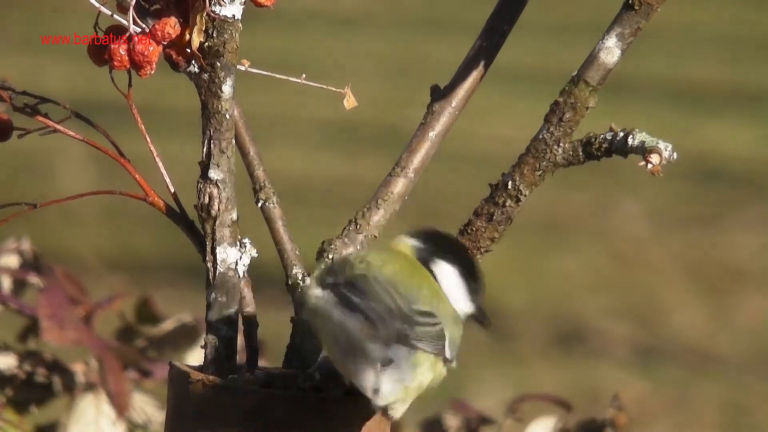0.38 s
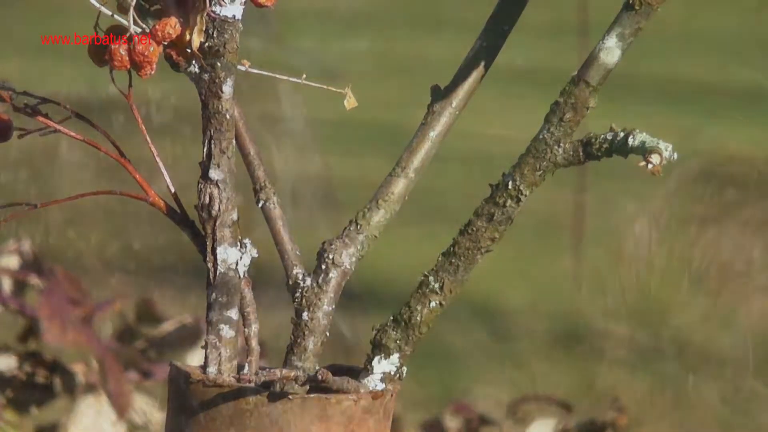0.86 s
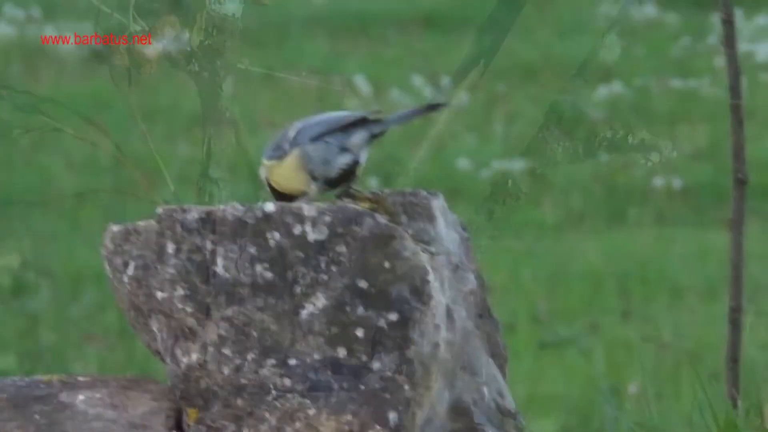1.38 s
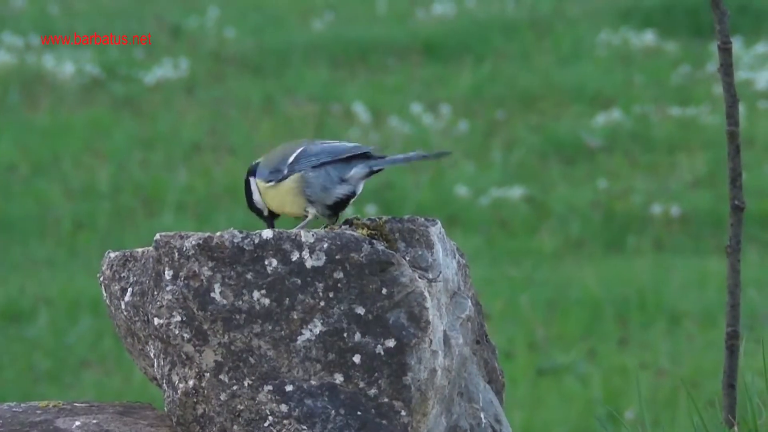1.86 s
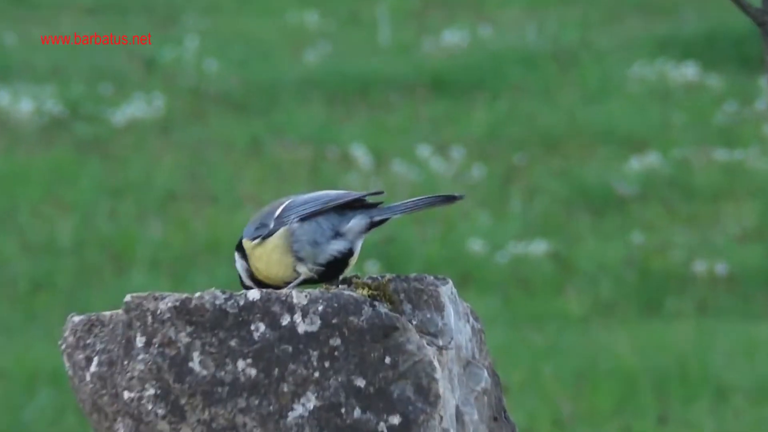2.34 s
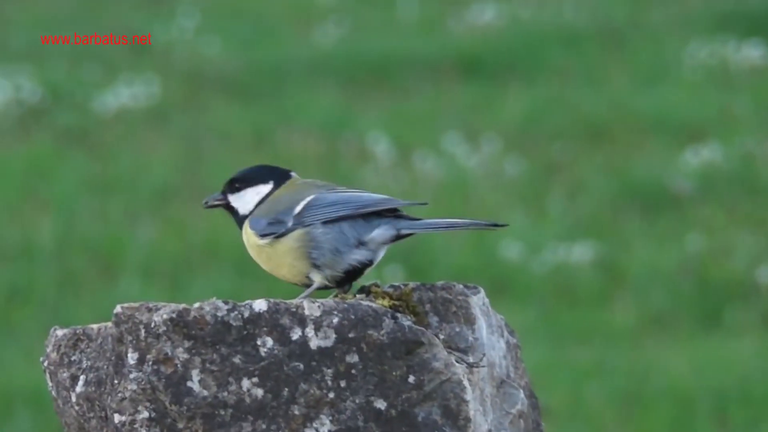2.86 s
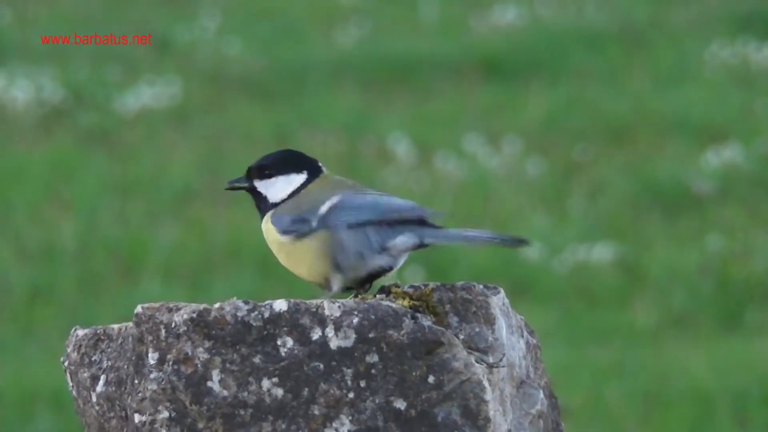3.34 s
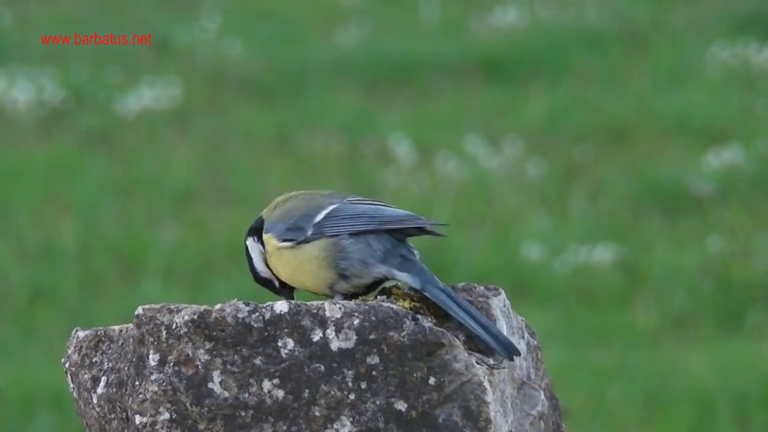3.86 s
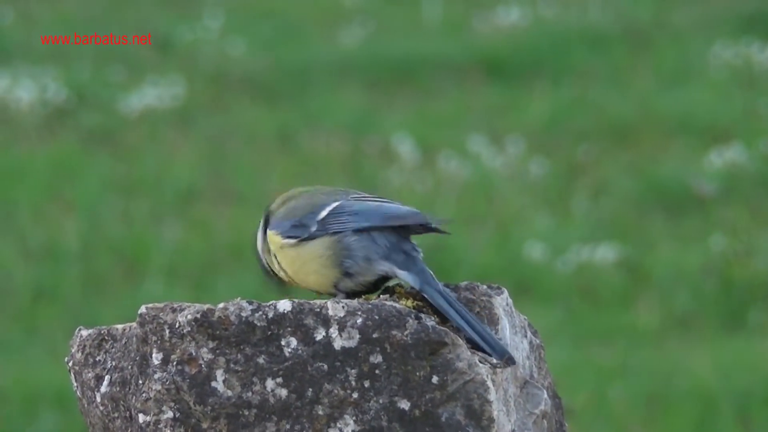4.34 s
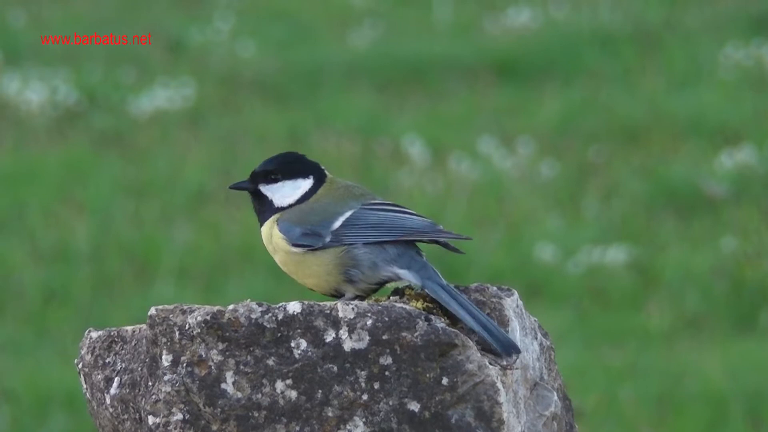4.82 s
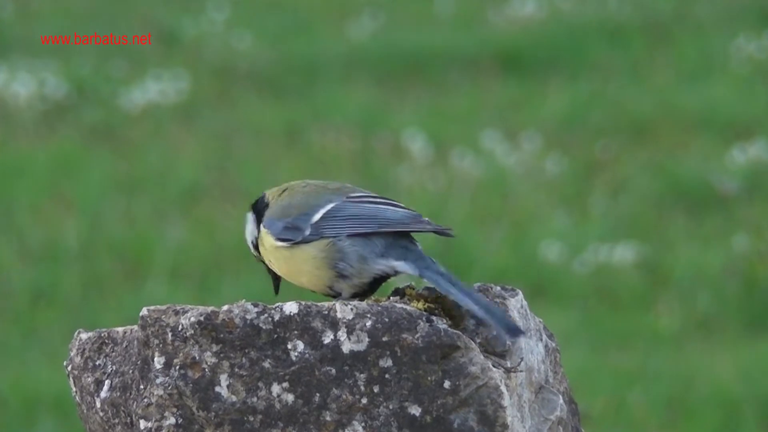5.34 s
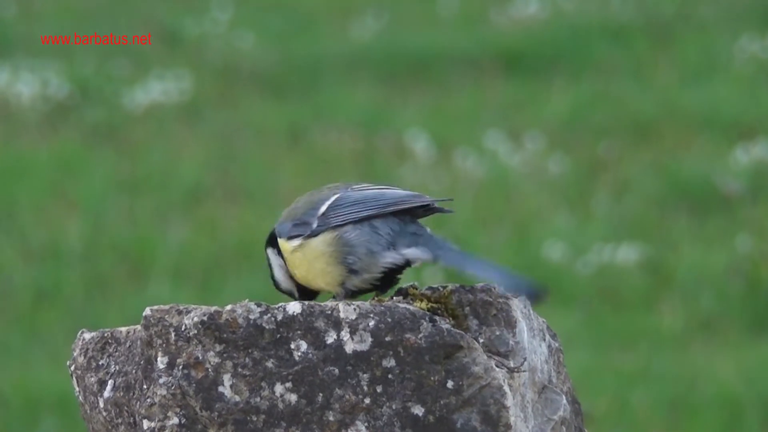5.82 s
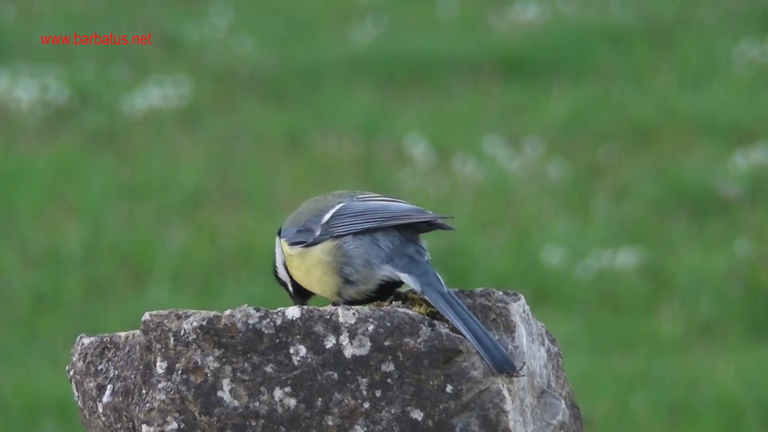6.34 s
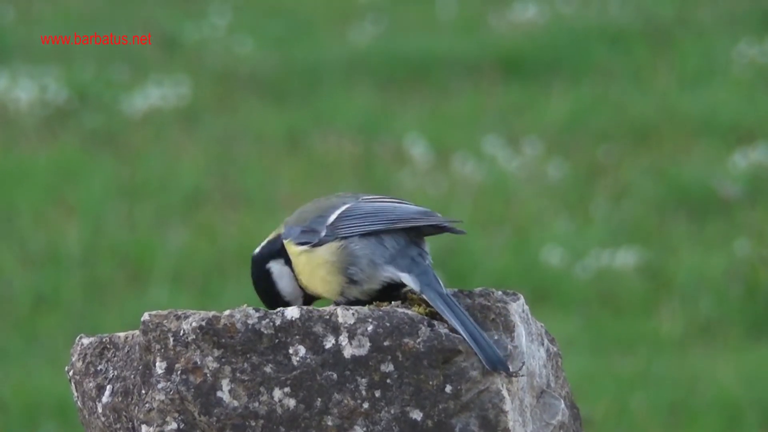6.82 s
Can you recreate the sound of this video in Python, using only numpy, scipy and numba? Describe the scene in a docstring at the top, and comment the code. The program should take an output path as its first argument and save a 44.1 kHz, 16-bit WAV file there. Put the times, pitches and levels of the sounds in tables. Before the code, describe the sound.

Quiet outdoor air with soft wide hiss, faint hum and small irregular low wind pops; another bird chatters weakly far off until 0.6 s. The air drops out for an instant at 0.7 s and fades back. From 1.1 to 2.25 s a close, central great tit alternates very high whistles, each flicked up from below, with short buzzy two-toned notes, every tenth of a second; a four-pulse dry churr cuts in at 1.5 s. A pause follows. At 3.2 s come a tiny peep and thin seep, then buzzes, a whistle and soft scrapes with a tick, a fading six-pulse churr at 3.6 s, and more whistle-buzz pairs from 3.9 to 4.5 s. Faint descending seeps sound at 4.9 and 5.1 s, small ticks at 5.1 and 5.9 s. From 6.0 s harsh scolding rasps, about fifteen a second, swell from faint to loud, with a brief gap at 6.65 s, until 6.93 s.

```python
"""A great tit calls close by: rising whistles alternate with buzzy notes, with thin seeps and short churrs.
Later a run of scolding rasps swells up; far chatter, ticks, soft scrapes, hum and wind pops lie underneath.
Whistles are swept tones with overtones, and buzzes are two tones that mix into sums and differences.
Churrs, rasps and chatter are noise through moving resonances, chopped by flaps. The rest is shaped noise,
apart from a few short pure peeps. The bird is nearly central, with a faint short echo."""
import sys
import numpy as np
from scipy import signal
from scipy.fft import rfft, irfft
from scipy.io import wavfile
from scipy.ndimage import uniform_filter1d
from numba import njit

SR = 44100
rng = np.random.default_rng(int(sys.argv[2]) if len(sys.argv) > 2 else 0)


def gain_from_db(level_db):
    """Convert decibel levels to linear amplitude factors (20 dB per decade)."""
    decades = np.asarray(level_db, float) / 20
    return 10 ** decades


def waveform_to_disk(signal):
    """Save audio, clipped to [-1, 1], as 16-bit WAV at the path in sys.argv[1]."""
    frames = np.transpose(np.atleast_2d(signal))
    scaled = np.clip(frames, -1, 1) * 32767
    samples = np.round(scaled).astype(np.int16)
    wavfile.write(sys.argv[1], SR, samples)


N = 306495
T = np.arange(N) / SR  # time of every sample in seconds

# how windpipe and beak pass each pitch: f/Hz, level/dB
THROAT = [(1500, -26), (2000, -25), (2700, -11), (3500, -5.5), (4700, 3.5), (5900, -4), (7000, -13.5),
          (8000, -20.5), (9500, -45), (16000, -57)]
# lower and upper limit of the bird's rough voices: f/Hz
VOICE_BAND = [1685, 6080]
# breath over a rasp: share of its length, level/dB
RASP_BREATH = [(0, -13), (.12, -7), (.45, -1.5), (.75, 1), (.9, -3), (1, -20)]
# resonances of a rasp beside the main one: f/Hz, width/Hz, level/dB, growth/dB per dB of effort
RASP_MODES = [(2504, 480, -5.5, -0.45), (4200, 800, -2, -0.031), (5920, 1540, -4, 0.19),
              (6860, 2800, 0.5, 0.6)]


def track(s, values):
    """A control curve at every sample."""
    return np.interp(T, s, values)


def unit(x):
    """Scale to rms 1."""
    return x / np.sqrt(np.mean(x ** 2))


def on_log(hz, table):
    """Read a table of f/Hz and level/dB as a gain, with pitch on a log scale."""
    f, db = np.transpose(table)
    return gain_from_db(np.interp(np.log(np.maximum(hz, 1)), np.log(f), db))


def drift(hz):
    """Smooth chance of rms 1 that changes about hz times a second."""
    k = int(SR / hz)
    return unit(uniform_filter1d(uniform_filter1d(rng.standard_normal(N), k), k))


def edged(s, db, edge_s):
    """Gain along a note that opens and shuts within edge_s."""
    gate = track([s[0] - edge_s, s[0], s[-1], s[-1] + edge_s], [0, 1, 1, 0])
    return gain_from_db(track(s, db)) * gate


@njit
def svf(x, hz, width):
    """State-variable band-pass: a resonance with a moving centre."""
    y, b, l = np.empty(len(x)), 0., 0.
    for i in range(len(x)):
        g, k = np.tan(np.pi * hz[i] / SR), width / hz[i]
        v = (b + g * (x[i] - l)) / (1 + g * (g + k))
        b, l, y[i] = 2 * v - b, l + 2 * g * v, k * v
    return y


def steep(x, hz, width):
    """A resonance applied twice, so that its sides fall more steeply."""
    hz = hz + np.zeros(N)
    return svf(svf(x, hz, 1. * width), hz, 1. * width)


def air():
    """Distant hum and hiss, unlike left and right, with one-sided low pops of wind on the microphone."""
    # colour of the sound common to both sides: f/Hz, level/dB per Hz
    mid_colour = [(15, -43), (25, -21), (130, -1.5), (170, -7), (405, -6), (439, -2), (476, -4.5),
                  (988, -7.5), (1610, -9), (3920, -10.5), (7920, -21), (9070, -22), (16000, -27)]
    # colour of the difference between the sides: f/Hz, level/dB per Hz
    side_colour = [(15, -44), (25, -4), (92, -4.5), (326, -2.5), (476, 0), (531, -1.5), (840, -3.5),
                   (1400, -5), (3820, -7), (4740, -15), (7710, -18.5), (9070, -18.5), (16000, -20.5)]
    # the air drops out for an instant and fades back: t/s, level/dB
    air_course = [(0, 0.2), (0.7158, 1), (.7165, -42), (.731, -77), (.745, -14), (.76, -3.5), (1.0, -2),
                  (1.3, 0.7), (6.95, 0.74)]
    mid_db, side_db = -53, -54
    dip_hz, dip_width_hz, dip_depth = 7780, 210, 0.59  # a narrow band where the hiss is weaker
    pops_per_s, pop_db, pop_s = 45, -46, .0007

    hz = np.arange(N // 2 + 1) * SR / N
    dip = 1 - dip_depth * np.exp(-((hz - dip_hz) / dip_width_hz) ** 2)
    mid, side = (unit(irfft(rfft(rng.standard_normal(N)) * on_log(hz, colour) * dip, N))
                 for colour in (mid_colour, side_colour))
    hiss = gain_from_db(mid_db) * mid + gain_from_db(side_db) * side * np.array([[1], [-1]])
    hiss = hiss * gain_from_db(.5 * drift(14.5))

    # pops come at random, in looser and denser groups, and differ in strength
    chance = pops_per_s / SR * gain_from_db(3.5 * drift(18))
    hits = (rng.random(N) < chance) * gain_from_db(2.5 * rng.standard_normal(N))
    bump = np.exp(-.5 * (np.arange(-200, 200) / SR / pop_s) ** 2)
    low_cut = signal.butter(1, 90, "high", fs=SR, output="sos")
    pops = signal.sosfilt(low_cut, np.convolve(hits, bump, "same"))
    lean = np.array([[.85], [1.15]])  # pops are stronger on the right
    return (hiss + gain_from_db(pop_db) * pops * lean) * gain_from_db(track(*np.transpose(air_course)))


def harsh(notes, breath, modes, rise_hz, rate_hz, wobble, depth, width, steady, rise, follow, late, ready):
    """Chaotic membranes drive a rising throat resonance; unsteady flaps chop the airflow."""
    share, shape = np.transpose(breath)
    hz, gain, bright, swell = np.full(N, 3000.), np.zeros(N), np.zeros(N), np.zeros(N)
    for start, end, db, open_hz, bright_db in notes:
        length = end - start
        g = edged(start + share * length, db + shape, 0.00049)
        on = g > 0
        gain += g
        # with ready > 0, a bright note starts with its throat further open
        first_hz = open_hz - rise_hz / (1 + gain_from_db(bright_db)) ** ready
        hz[on] = track([start, start + rise * length], [first_hz, open_hz])[on]
        bright[on] = gain_from_db(bright_db)
        # the side resonances swell (late > 0) or fade (late < 0) over the note
        swell[on] = track([start, end], [1 - late, 1])[on]
    opening = (hz / 3500) ** follow  # the opening beak lifts the higher resonances along
    effort = np.clip(gain / gain_from_db(-28), .03, 3)

    chaos = rng.standard_normal(N)
    voice = unit(steep(chaos, hz, width))
    for f, mode_width, db, grow in modes:
        above = f > hz  # only resonances above the main one brighten and follow the beak
        ringing = unit(steep(chaos, f * opening ** above, mode_width))
        voice = voice + swell * gain_from_db(db) * bright ** above * effort ** grow * ringing

    # the swing of the membranes saturates, which evens the loudness out
    voice /= (uniform_filter1d(voice ** 2, size=50) + 0.17) ** (steady / 2)
    voice /= np.sqrt(uniform_filter1d(voice ** 2, size=900))
    flap = 2 * np.pi * np.cumsum(rate_hz * (1 + wobble * drift(rate_hz / 2))) / SR
    chop = unit(1 + depth / (1 + bright) * np.cos(flap))  # bright notes are chopped less
    band = signal.butter(N=6, Wn=VOICE_BAND, btype="band", fs=SR, output="sos")
    return signal.sosfilt(band, gain * voice * chop)


def far_chatter():
    """Faint chatter of another bird further off: rasps with a narrower throat resonance."""
    # start t/s, end t/s, level/dB, open throat f/Hz, brightness/dB
    far_notes = [(.015, .05, -51, 3500, -3), (.08, .12, -53.5, 3450, -12), (.16, .195, -53.5, 3640, -10),
                 (.25, .29, -55, 3970, -10), (.44, .49, -54, 4140, -4), (.59, .63, -57, 4400, -8)]
    return harsh(far_notes, RASP_BREATH, RASP_MODES[1:], rise_hz=300, rate_hz=560, wobble=.2, depth=.45,
                 width=600, steady=.85, rise=.7, follow=.1, late=.3, ready=0)


def scrapes():
    """Soft friction: fluttering noise in a low band that moves."""
    # start t/s, end t/s, level/dB, start f/Hz, end f/Hz
    rubs = [(3.268, 3.325, -49.5, 1250, 1700), (3.4, 3.416, -47.5, 860, 800), (3.555, 3.6, -59, 1950, 2000)]
    out, noise = 0, rng.standard_normal(N) * gain_from_db(2.5 * drift(249))
    for start, end, db, hz0, hz1 in rubs:
        band = unit(steep(noise, track([start, end], [hz0, hz1]), 850))
        out = out + edged([start, end], [db, db - 5], .004) * band
    return out


def ticks():
    """Small hard contacts: a dying crack of noise through a few broad modes."""
    # t/s, relative level/dB, ring t/s
    contacts = [(3.399, -28.5, 0.0044), (5.128, -36.5, 0.0033), (5.936, -30.5, 0.0058)]
    # what rings in a tick: f/Hz, width/Hz, relative level/dB
    contact_modes = [(440, 140, -2), (830, 1050, -3), (1900, 300, 1), (3600, 1300, 2), (5490, 2400, 1),
                     (8980, 1200, -8.5), (13230, 12300, -11.5)]
    crack = sum(gain_from_db(db) * (T >= s) * np.exp(-np.maximum(T - s, 0) / ring) for s, db, ring in contacts)
    noise = rng.standard_normal(N)
    ringing = unit(sum(gain_from_db(db) * unit(steep(noise, f, w)) for f, w, db in contact_modes))
    return crack * ringing / 2


def peeps():
    """Brief or faint pure sine notes that glide and swell like a bell curve."""
    # start t/s, end t/s, start f/Hz, end f/Hz, level/dB at the middle
    pure_notes = [(0.742, 0.758, 4000, 3940, -56), (3.06, 3.135, 6640, 6850, -62),
                  (3.2167, 3.2208, 3050, 4100, -31)]
    out = np.zeros(N)
    for start, end, hz0, hz1, db in pure_notes:
        bell = np.sin(np.pi * track([start, end], [0, 1]))
        phase = 2 * np.pi * np.cumsum(track([start, end], [hz0, hz1])) / SR
        out += np.sqrt(2) * gain_from_db(db) * bell * np.sin(phase)
    return out


def rasps():
    """Scolding rasps: a wide throat resonance that climbs as the beak opens, chopped by fast flaps."""
    # start t/s, end t/s, level/dB, open throat f/Hz, brightness/dB
    rasp_notes = [(6.035, 6.075, -48.5, 3940, -10), (6.1, 6.139, -45.5, 4260, -6),
                  (6.165, 6.205, -42.5, 4100, 0), (6.23, 6.275, -37.5, 4000, -3),
                  (6.297, 6.343, -33.5, 3800, -3), (6.367, 6.414, -30, 3920, -4),
                  (6.434, 6.487, -27, 3900, -2.5), (6.506, 6.56, -25.5, 3920, -3),
                  (6.581, 6.636, -25, 3880, -3), (6.74, 6.791, -26, 4140, -8.5),
                  (6.821, 6.871, -24.5, 4000, -9.5), (6.888, 6.932, -24, 3900, -9)]
    return harsh(rasp_notes, RASP_BREATH, RASP_MODES, rise_hz=970, rate_hz=560, wobble=.2, depth=.45,
                 width=1100, steady=.85, rise=.7, follow=.3, late=.7, ready=0)


def churrs():
    """Short churrs: a narrower throat resonance with slower, deeper flaps and early side resonances."""
    # start t/s, end t/s, level/dB, open throat f/Hz, brightness/dB
    churr_notes = [(1.479, 1.509, -19.5, 3580, -7.5), (1.519, 1.546, -23.5, 3325, -50),
                   (1.5605, 1.586, -25, 3300, -49), (1.602, 1.628, -26, 3320, -51),
                   (3.607, 3.635, -25.5, 3600, -9.5), (3.647, 3.671, -32.5, 3310, -25),
                   (3.689, 3.709, -34, 3170, -20), (3.731, 3.752, -33, 3160, -50),
                   (3.776, 3.792, -38, 3150, -26.5), (3.824, 3.844, -38.5, 3050, -30)]
    # breath over a churr: share of its length, level/dB
    churr_breath = [(0, -16), (.12, -8), (.35, 0), (.6, -1.5), (.85, -8), (1, -18)]
    # resonances beside the main one: f/Hz, width/Hz, level/dB, growth/dB per dB of effort
    churr_modes = [(2200, 450, -27, -.3), (4500, 1200, 5, -.35), (5400, 1000, -3, -.1),
                   (6800, 1000, -16, .5)]
    return harsh(churr_notes, churr_breath, churr_modes, rise_hz=790, rate_hz=260, wobble=.15, depth=.62,
                 width=550, steady=.9, rise=.25, follow=.1, late=-1.5, ready=3)


def buzzes():
    """Both sides of the voice box sound at once; their coupling makes sum and difference tones."""
    # start t/s, length t/s, first voice alone t/s, first voice's starting f/Hz, second voice f/Hz, level/dB
    buzz_notes = [(1.208, 0.056, 0.0075, 2687, 1901, -18), (1.393, 0.056, 0.006, 2654, 1863, -18.5),
                  (1.814, 0.06, 0.0088, 2800, 1877, -20), (2.003, .057, 0.01, 2760, 1864, -21),
                  (2.2, .054, 0.0058, 2695, 1846, -23), (3.323, 0.052, 0.0072, 2775, 1868, -22),
                  (3.515, 0.051, 0.0072, 2696, 1895, -25), (4.009, 0.063, .012, 2854, 1894, -22.5),
                  (4.203, .058, 0.0111, 2747, 1844, -23.5), (4.417, .046, 0.0062, 2600, 1806, -25.5)]
    # tones of the pair: multiple of first, multiple of second, relative level/dB, change over the note/dB
    coupling = [(1, 0, -11, -5.5), (2, 0, -3.5, -3.5), (3, 0, -22, -11.5), (0, 1, -27.5, 10),
                (0, 2, -7, -8), (0, 3, -10.5, -5), (1, 1, -5, 0.5), (1, 2, -11.5, 2), (2, -1, -14.5, -46),
                (2, 1, -21.5, -3), (1, 3, -30.5, -2), (2, 2, -30.5, -13.5)]
    attack_db, attack_s, hold_s = -5, 0.0083, 0.01
    fade_db, close_s, close_db = -9, 0.0052, -7.5
    breath_db, pop_db = -15, -5
    slide_hz_per_s, rest_hz = 11500, 2518  # the first voice slides down to its resting pitch
    # the second voice joins sharp, sags with the first, then creeps up
    sharp_hz, sag_s, creep_hz = 40, 0.011, 45
    wander, jitter, shimmer_db = .007, .0075, 1.5  # slow and quick pitch unsteadiness (share), level flicker

    gain, second, along, pop, path = 0, 0, 0, 0, []
    for start, length, alone, first_hz, second_hz, db in buzz_notes:
        s = start + np.array([0, attack_s, attack_s + hold_s, length - close_s, length])
        g = edged(s, db + np.array([attack_db, 0, 0, fade_db, fade_db + close_db]), .003)
        gain = gain + g
        # the membranes snap open
        pop = pop + gain_from_db(db + attack_db) * track(start - np.array([.003, .0025, .0005]), [0, 1, 0])
        second = second + (g > 0) * track([start + alone - .001, start + alone + 0.00011], [0, 1])
        along = along + (g > 0) * track([start + alone, start + length], [0, 1])
        t = np.linspace(0, length, num=30)
        sharp = np.exp(-(t / sag_s) ** 2)
        first_path = np.maximum(first_hz - slide_hz_per_s * t, rest_hz)
        second_path = second_hz + sharp_hz * sharp + creep_hz * (t / length) ** 2
        path += zip(start + t, first_path, second_path)
    s, *pitch = np.transpose(path)
    hz = np.array([track(s, f) * (1 + wander * drift(99.8) + jitter * drift(1490)) for f in pitch])
    phase = 2 * np.pi * np.cumsum(hz, axis=1) / SR

    # each voice bends the pitch of the other, so neighbouring tones stand a quarter turn apart
    tones = 0
    for m, n, db, change in coupling:
        size = gain_from_db(db + change * along + shimmer_db * drift(270)) * (second if n else 1)
        tones = tones + size * np.exp(1j * (m * phase[0] + n * phase[1] + n * n * np.pi / 2))
    # the swing of the membranes saturates, flattening the beats between the tones
    tones = (tones / (np.abs(tones) + .3) ** .55).imag
    tones /= np.sqrt(uniform_filter1d(tones ** 2, size=200))

    breath = unit(steep(rng.standard_normal(N), 4500, 1400))
    voice = gain * tones + (gain_from_db(breath_db) * gain * second + gain_from_db(pop_db) * pop) * breath
    low_cut = signal.butter(6, VOICE_BAND[0], "high", fs=SR, output="sos")
    return signal.sosfilt(low_cut, voice)


def held(t, pitch, glide, db):
    """Pitch and effort of a held whistle: a slow glide, a fade and a close, drooping if it glides down."""
    fade_db, fade_db_per_hz = -13.5, -0.0578  # it fades, less so the more it glides down
    close_s, close_hz, close_db = .006, -250, -9
    droop_below_hz = -55  # only notes gliding down further than this droop in pitch
    closing = np.clip(1 - (t[-1] - t) / close_s, 0, 1) ** 2
    f = pitch + glide * t / t[-1]
    level = db + (fade_db + fade_db_per_hz * glide) * t / t[-1] + close_db * closing
    effort = level - 20 * np.log10(on_log(f, THROAT))  # make up for what the throat takes away
    return f + close_hz * closing * (glide < droop_below_hz), effort


def whistles():
    """One membrane sweeps up through the throat resonance, so its overtone flashes first, then holds."""
    # hold starts t/s, length t/s, pitch f/Hz, glide over the hold f/Hz, level/dB, sweep effort/dB, settling t/s
    whistle_notes = [(1.1187, 0.057, 7970, -500, -40.5, -17.5, 0.0023),
                     (1.3094, 0.055, 7340, -78, -25.5, -18.5, .0015),
                     (1.73, 0.058, 7330, -92, -28.5, -20, .002),
                     (1.916, 0.054, 7260, -83, -27, -20, 0.0016),
                     (2.1114, 0.057, 7070, 32.5, -25, -20, 0.0086),
                     (3.427, 0.052, 7290, -31, -38.5, -24, .006),
                     (3.9207, 0.064, 7220, 28, -31, -23, 0.0042),
                     (4.114, 0.057, 7210, -12.5, -30, -23, .003), (4.31, 0.055, 7090, 35, -29, -23, 0.0036)]
    # thin seeps that start near their pitch: start t/s, length t/s, pitch f/Hz, glide f/Hz, level/dB, settling t/s
    seep_notes = [(3.2302, .057, 7540, -170, -37, .002), (4.864, 0.089, 7640, -400, -40.5, 0.0058),
                  (5.103, 0.098, 7540, -400, -44, 0.0087)]
    # the upward sweep: f/Hz, effort/dB
    sweep = [(2000, -20), (2200, 0), (2500, -5), (2950, 0), (3700, 1.5), (4700, -1.5), (5800, 1),
             (6500, 0.5)]
    # how long before the hold each point of the sweep comes: t/s
    sweep_lead = [.0125, .011, .0095, .0078, .006, .0045, .003, 0]
    # second and third harmonic of the whistling membrane: level/dB
    overtones = [-8, -17]
    ease_s = 0.0034  # the effort of the sweep eases into that of the hold
    hiss_db, hiss_hz, hiss_s = -24, 4330, 0.018  # air rushing past around the sweep
    seep_flat_hz, seep_rise_db, seep_flutter_db = 506, -3, 1.3  # a seep starts flat and creeps in

    lead_hz, lead_db = np.transpose(sweep)
    notes, hiss, flutter = [], 0, drift(90)
    for start, length, pitch, glide, db, sweep_db, settle_s in whistle_notes:
        t = np.linspace(0, length, num=60)
        f, effort = held(t, pitch, glide, db)
        f = f + (lead_hz[-1] - pitch) * np.exp(-t / settle_s)
        effort = effort + (sweep_db + lead_db[-1] - effort[0]) * np.exp(-t / ease_s)
        times = start + np.r_[-np.array(sweep_lead), t]
        notes.append((times, np.r_[lead_hz, f], np.r_[sweep_db + lead_db, effort]))
        hiss_times = start + hiss_s * np.array([-1, -.5, 1])
        hiss = hiss + edged(hiss_times, sweep_db + hiss_db + np.array([-6, 0, -12]), .002)
    for start, length, pitch, glide, db, settle_s in seep_notes:
        t = np.linspace(0, length, num=60)
        f, effort = held(t, pitch, glide, db)
        settling = np.exp(-t / settle_s)
        effort = effort + seep_flutter_db * np.interp(start + t, T, flutter) + seep_rise_db * settling
        notes.append((start + t, f - seep_flat_hz * settling, effort))

    gain = sum(edged(s, effort, 0.0028) for s, f, effort in notes)
    s, f, _ = np.hstack(sorted(notes, key=lambda note: note[0][0]))
    hz = uniform_filter1d(track(s, f), size=30) * (1 + 0.0018 * drift(400))
    phase = 2 * np.pi * np.cumsum(hz) / SR
    tones = sum(gain_from_db(db) * on_log(k * hz, THROAT) * np.sin(k * phase)
                for k, db in enumerate([0, *overtones], start=1))
    rush = hiss * unit(steep(rng.standard_normal(N), hiss_hz, 3500))
    return np.sqrt(2) * gain * gain_from_db(.8 * drift(120)) * tones + rush


def scene():
    """The bird nearly straight ahead, faintly scattered back by ground and twigs, over the air."""
    # the left side hears the bird a touch louder and a fraction of a sample later
    left_share, left_lag = 0.01, 0.095
    echo_db, echo_t60_s, echo_spread = -28, .09, .4

    bird = far_chatter() + scrapes() + ticks() + peeps() + rasps() + churrs() + buzzes() + whistles()
    side = left_share * bird - left_lag * np.gradient(bird)
    # the echo is dying noise, partly different on each side
    lag = T[:SR // 4]
    tail = rng.standard_normal(len(lag)) + echo_spread * rng.standard_normal((2, len(lag)))
    tail = tail * gain_from_db(-60 * lag / echo_t60_s)
    tail = tail / np.sqrt(np.sum(tail ** 2) / 2)
    echo = signal.fftconvolve(bird[None], tail, axes=1)[:, :N]
    return bird + side * np.array([[1], [-1]]) + gain_from_db(echo_db) * echo + air()


def low_pass(x):
    """Removes everything above the highest recorded frequency."""
    return signal.sosfilt(signal.butter(12, 16500, fs=SR, output="sos"), x)


def record(dry):
    """The preamplifier bends the loudest notes slightly, which leaves faint third overtones."""
    drive = 2.8
    return low_pass(np.tanh(drive * dry) / drive)


dry = scene()
out = record(dry)
waveform_to_disk(out)
```